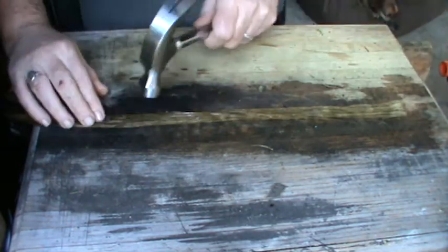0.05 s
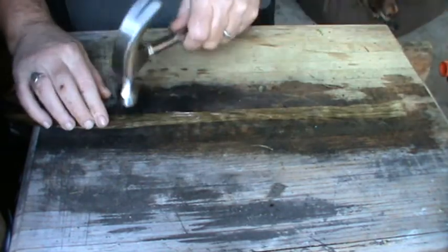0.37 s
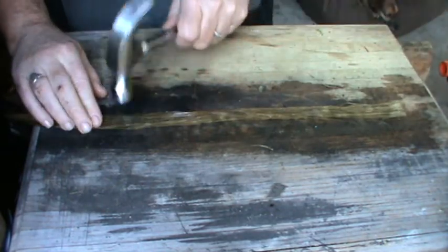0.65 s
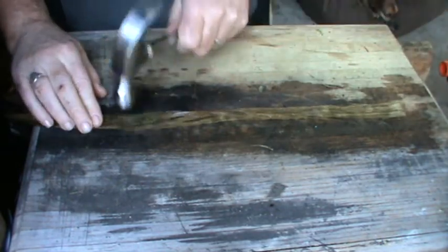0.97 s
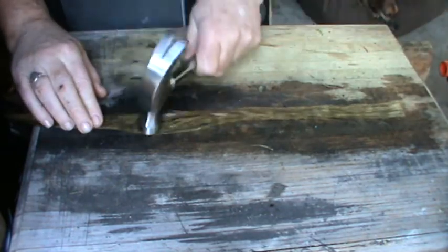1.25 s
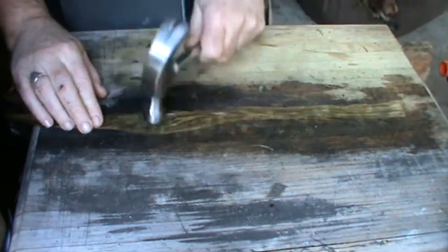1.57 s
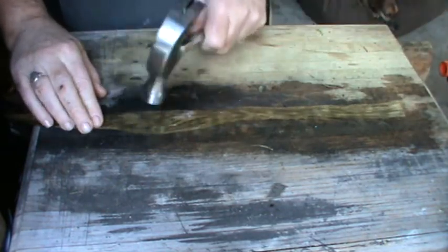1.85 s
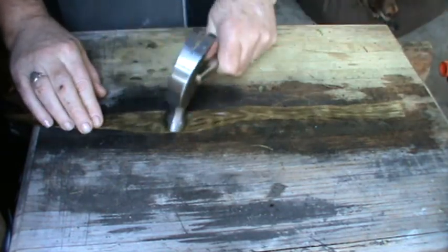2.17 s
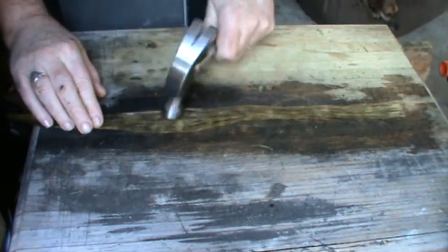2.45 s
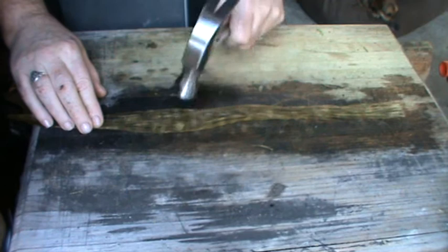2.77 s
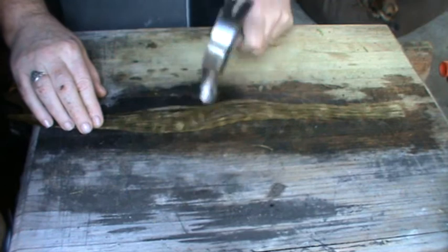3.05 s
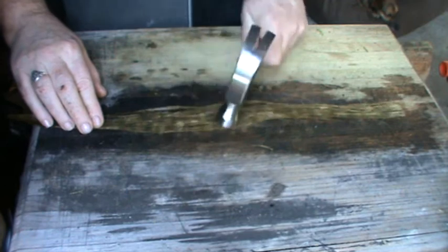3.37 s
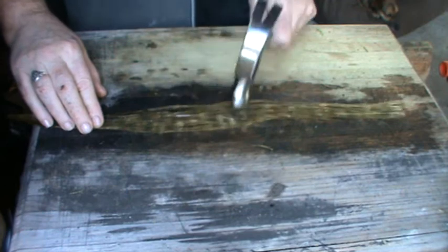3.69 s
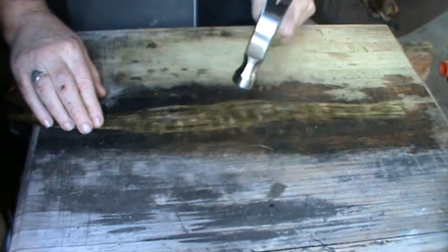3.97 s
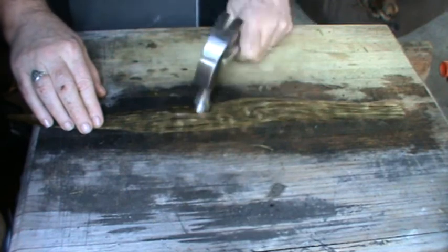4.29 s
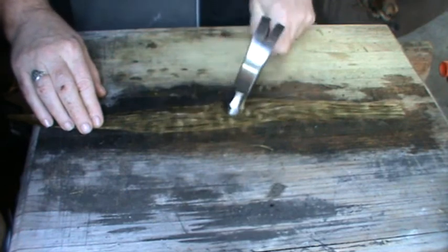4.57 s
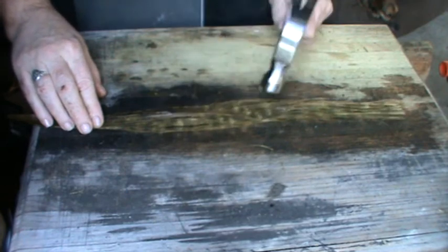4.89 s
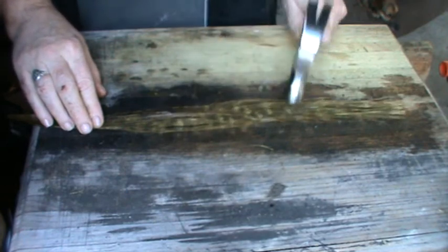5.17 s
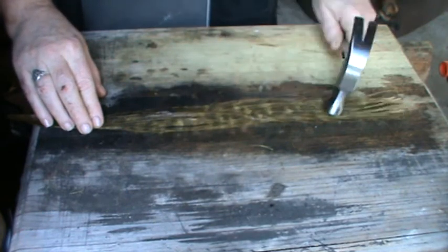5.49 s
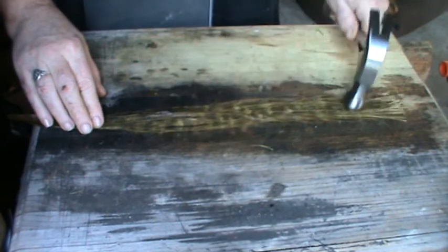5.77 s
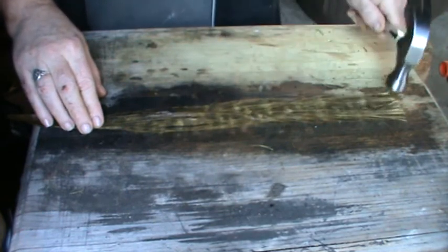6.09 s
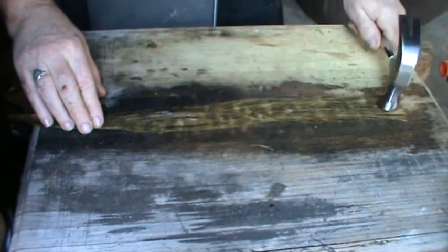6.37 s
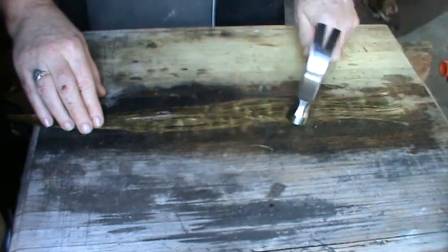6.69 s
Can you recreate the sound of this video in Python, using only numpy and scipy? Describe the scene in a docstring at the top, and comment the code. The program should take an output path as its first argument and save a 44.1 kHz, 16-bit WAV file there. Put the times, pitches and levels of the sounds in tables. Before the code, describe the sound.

A steel hammer taps a leaf on a wooden board steadily, about four sharp, booming knocks a second, in a small room.

```python
"""A steel hammer taps a long leaf flat on a wooden board, about four blows a second, left to right.
Each blow cracks the fibres and knocks the board; bench and small room boom on after it.
A few blows make the steel head ring thinly. Under it lie a few tiny clicks, a faint, high,
intermittent chirping and quiet room noise. Two microphones feed a limiter."""
import sys
import numpy as np
from scipy import signal
from scipy.fft import rfft, irfft, next_fast_len
from scipy.io import wavfile
from scipy.ndimage import uniform_filter1d, minimum_filter1d

SR = 44100
rng = np.random.default_rng(int(sys.argv[2]) if len(sys.argv) > 2 else 0)


def generate_wav(signal):
    """Clip the signal to [-1, 1] and save it as 16-bit WAV at the path in sys.argv[1]."""
    frames = np.transpose(np.atleast_2d(signal))
    scaled = np.clip(frames, -1, 1) * 32767
    pcm = np.round(scaled).astype(np.int16)
    wavfile.write(sys.argv[1], SR, pcm)


N = 301281
AGE_S = np.arange(SR // 2) / SR  # time since an onset
SIDES = np.array([[1], [-1]])  # left, right

# hammer blows: t/s, strength/dB, contact hardness/dB
BLOWS = [(0.5495, -0.2, 1.2), (0.787, 2, 5), (1.0266, .5, .5), (1.253, 0.4, 0.7), (1.4823, -0.3, -0.6),
         (1.7076, -0.2, -1), (1.9356, 0.1, 0.4), (2.1667, 2, 3.5), (2.3984, .5, 2.5), (2.623, -0.4, -0.4),
         (2.866, 0.8, -.5), (3.107, 1, 1.3), (3.3382, 1.5, 1.5), (3.5763, -0.5, 0.5), (3.8085, .2, -.5),
         (4.0471, -.1, 3), (4.2904, 2.5, 3), (4.5123, 0.6, 2), (4.7441, 0, 0), (4.973, -1, -0.5),
         (5.21, -0.5, 2.5), (5.4452, -1.5, 2), (5.6844, -1, 4.5), (5.9204, -1, 2.9), (6.148, 0, 3),
         (6.3749, -0.7, 3), (6.6793, -0.9, 3)]
# hammer path: t/s, place (0 left, 1 middle, 2 right)
HAMMER_PATH = [(.55, 0.031), (2.3, 0.18), (2.62, 0.4), (2.87, 0.73), (3.3, 1), (5.1, 1.06), (5.45, 1.737),
               (6.38, 1.88), (6.68, 1.14)]
# room sound balance: f/Hz, left minus right/dB
ROOM_BALANCE = [(50, 4.5), (130, -2), (280, -2), (550, -4.5), (750, -5), (1200, -2.5), (3000, -2),
                (8000, 0)]
def hammer():
    """Each blow: board knock and contact click, their reflections, then boom and reverberation."""
    out = np.zeros((2, N))
    places = [np.interp(t_s, *np.transpose(HAMMER_PATH)) for t_s, *_ in BLOWS]
    booms = bench_booms(places)
    rooms = np.array([diffuse_field() for _ in range(3)])  # left, middle, right
    balance = amp(SIDES * along(ROOM_BALANCE, freqs(len(AGE_S))) / 2)
    for (t_s, strength_db, hardness_db), place, boom in zip(BLOWS, places, booms):
        force = blow_spectrum(strength_db, hardness_db, place)
        direct = colour(board_knock(place), force) + contact_click(place)
        room = irfft(rfft(boom + reverberation(rooms, place)) * balance, len(AGE_S))
        fibres = fibre_crunch()
        direct = colour(direct, fibres)
        room = colour(colour(room, force), fibres)
        add(out, t_s, direct + room)
        add_reflections(out, t_s, direct)
    return out


def blow_spectrum(strength_db, hardness_db, place):
    """A harder contact is shorter and drives the upper modes more: f/Hz, level/dB."""
    edge = max(place - 1, 0)  # hollow toward the right end
    hollow = [(hz, strength_db + db * edge) for hz, db in [(70, -5.5), (300, -0.5), (520, 3.5)]]
    upper_db = strength_db + hardness_db
    treble_db = -3 + 0.86 * hardness_db + 2.5 * abs(place - 1)
    return hollow + [(1100, upper_db), (2200, upper_db), (4500, treble_db)]


# board modes: f/Hz, t60/s, level/dB struck left, middle, right
BOARD_MODES = [(162.7, 0.057, -2, -5, -6), (291, 0.043, 5.5, 3.5, 3), (373, 0.036, 1, -3.5, -5),
               (479, 0.02, -13, -14.5, -10), (722, 0.037, 1, -18.5, -6), (805, 0.051, -8, -40, 1),
               (1167, 0.066, -11.5, -35.5, -13), (1407, 0.031, -16, -15.5, -37),
               (1803, 0.02, -12.5, -16.5, -22.5), (2710, 0.017, -16.5, -31, -24),
               (3266, 0.025, -23.5, -31, -29), (4580, 0.014, -24.5, -26, -31)]
def board_knock(place, gain_db=-7, cushion_s=0.0013):
    """Quickly damped modes of the wood; the leaf cushions their onset."""
    modes = np.array([-np.sin(2 * np.pi * hz * AGE_S) * fade(t60_s) for hz, t60_s, *_ in BOARD_MODES])
    knock = amp(gain_db) * mode_gains(BOARD_MODES, place) @ modes
    knock *= 1 - np.exp(-(AGE_S / cushion_s) ** 2)
    return colour(knock, [(40, -13.5), (95, -11.5), (145, 0)])  # a small board radiates little bass


# click spectrum: f/Hz, level/dB
CLICK_SPECTRUM = [(600, 8), (1500, 7.5), (3000, 8), (5500, -5.5), (8500, -1), (12000, -6.5), (16000, -19)]
def contact_click(place, gain_db=-26, edge_db=-3.5, scatter_db=1.4):
    """Noise burst at contact with a faint tail, softer toward the right end."""
    click = stereo_noise(len(AGE_S), CLICK_SPECTRUM) * (fade(0.0091) + amp(-18) * fade(0.12))
    level_db = gain_db + edge_db * max(place - 1, 0) + scatter_db * rng.standard_normal()
    return click * amp(level_db + SIDES * 1.1)


def fibre_crunch(bands=14, scatter_db=2.3):
    """Fibres give way differently at each blow, so the treble is uneven: f/Hz, level/dB."""
    uneven_db = scatter_db * rng.standard_normal(bands)
    return [(1800, 0)] + list(zip(np.geomspace(2300, 14000, bands), uneven_db))


# bench and room resonances: f/Hz, level/dB struck left, middle, right
BOOM_MODES = [(59.8,-11,-9,-9), (129,-16,-8,-11), (159.8,-1,-1.5,-2.5), (181.8,-13,-29.5,-22),
              (194.25,3.5,2.5,-2.5), (228.3,-10.5,-14,-4.5), (253.6,-3.5,-17.5,-12), (272.1,1.5,2.5,6),
              (290.2,5.5,6.5,8.5), (310.5,-18,-4.5,-28), (324,-1,-11,-0.5), (351,-12,-2,-0.5),
              (375.2,-6,-10,-8), (409,-9,-7,-22), (472,-7,-3,-4.5), (502.8,3.5,-6,6), (528.4,1.5,-3,-3),
              (557,-2,-6,4), (576.7,3,-21,5), (661,-16,-23,-4), (718.4,-8,-15,-7.5), (740,-26,-22,-1),
              (799.7,-10,-19,-2.5), (820,-20,-15,-5), (851,-27,-13,1.5), (922,-9,-10,-4),
              (1021,-25,-26,3.5), (1146,-10,-14.5,-41), (1190,-13.5,-9.5,-40), (1454,-46,-13,-43)]
def bench_booms(places, gain_db=-25, in_step_s=0.039):
    """One boom per place: low modes swell in step, high ones die sooner and scatter in phase."""
    modes = []
    for hz, *_ in BOOM_MODES:
        common, side = rng.standard_normal(2)
        phase = common * (hz / 390) ** 3 + SIDES * side * min(hz / 550, 1) / 2
        envelope = swell(t60_s=0.27 * (300 / hz) ** 0.11, rise_s=0.015, hold_s=0.064)
        modes.append(envelope * np.cos(2 * np.pi * hz * (AGE_S - in_step_s) + phase))
    return [amp(gain_db) * np.tensordot(mode_gains(BOOM_MODES, place), modes, 1) for place in places]


# first reflections: delay/s, level/dB, left minus right/dB
REFLECTIONS = [(0.0137, -19.5, 4), (0.0231, -11, -3), (0.0286, -11.5, 2.5), (0.0371, -14, 3),
               (.052, -12.5, -7.5), (.069, -11, -1)]
# wall and bench response: f/Hz, level/dB
WALL_RESPONSE = [(60, -7.5), (200, -1.5), (1500, -2), (4000, -2.5), (8000, -4), (11000, -6), (15000, -19)]
def add_reflections(out, t_s, direct):
    """Walls and bench return delayed copies and swallow their treble."""
    reflected = colour(direct, WALL_RESPONSE)
    for delay_s, level_db, pan_db in REFLECTIONS:
        add(out, t_s + delay_s, reflected * amp(level_db + SIDES * pan_db / 2))


def reverberation(rooms, place, gain_db=-22, fresh_gain=0.39):
    """Paths through the room change as the hammer travels, and a little from blow to blow."""
    weights = np.sqrt(np.clip(1 - abs(place - np.arange(3)), 0, 1))
    return amp(gain_db) * (np.tensordot(weights, rooms, 1) + fresh_gain * diffuse_field())


# reverberation spectrum: f/Hz, level/dB
DIFFUSE_SPECTRUM = [(30, -6.5), (60, -6.5), (92, -7), (140, 3), (300, -0.5), (550, 3), (850, -2.5),
                    (1200, -5), (1500, -14), (2200, -20.5), (3000, -27), (4400, -29.5), (5500, -33.5),
                    (9500, -39), (12500, -45.5), (16000, -59)]
# reverberation time: f/Hz, t60/s
ROOM_DECAY = [(50, 0.2), (150, 0.4), (500, 0.4), (1100, 0.33), (2500, 0.32), (5000, 0.35), (12000, 0.16)]
def diffuse_field():
    """Diffuse room sound, each band with its own decay."""
    n = len(AGE_S)
    spectrum = rfft(stereo_noise(n, DIFFUSE_SPECTRUM))
    centres_hz, decays_s = np.transpose(ROOM_DECAY)
    out = 0
    for share, t60_s in zip(np.eye(len(centres_hz)), decays_s):
        band_gain = along(np.column_stack([centres_hz, share]), freqs(n))
        out += irfft(spectrum * band_gain, n) * swell(t60_s, rise_s=0.0011, hold_s=0.063)
    return out


# blows that ring the head: t/s, level/dB
HEAD_RINGS = [(.787, -68), (1.253, -67), (1.482, -71), (1.707, -53)]
def steel_ring(hz=7890, t60_s=0.42):
    """One thin mode of the hammer head."""
    out = np.zeros((2, N))
    for t_s, level_db in HEAD_RINGS:
        add(out, t_s, amp(level_db) * np.sin(2 * np.pi * hz * AGE_S) * fade(t60_s))
    return out


# one click as the chirping starts, then tiny snaps after blows: t/s, level/dB
SMALL_CLICKS = [(0.357, -43), (.856, -33), (1.095, -40), (3.285, -44), (4.565, -34), (6.723, -32.5)]
def small_clicks(gain_db=-3):
    """Small clicks and lift ticks: tiny noise bursts with a trace of room."""
    out = np.zeros((2, N))
    envelope = fade(0.018) + amp(-18) * fade(0.16)
    for t_s, level_db in list(SMALL_CLICKS) + lift_ticks():
        noise = stereo_noise(len(AGE_S), [(500, 0), (2500, 3), (8000, -2.5), (13000, -10)])
        add(out, t_s, noise * amp(level_db + gain_db) * envelope)
    return out


def lift_ticks(from_s=2.6, lag_s=0.15, jitter_s=0.012, level_db=-45, scatter_db=1.5):
    """A faint tick as the hammer rises after each later blow: t/s, level/dB."""
    draws = rng.standard_normal((len(BLOWS), 2))
    ticks = [(t_s + lag_s + jitter_s * late, level_db - scatter_db * softer)
             for (t_s, *_), (late, softer) in zip(BLOWS, draws) if t_s > from_s]
    return [(t_s, db) for t_s, db in ticks if t_s < N / SR]


# chirping spells: start/s, end/s, period/s
CHIRP_SPELLS = [(.38, 2.5, 0.075), (2.5, 3.7, .041), (5.591, 6.67, .06)]
# pips of one chirp: f/Hz, level/dB, centre/s, half width/s
CHIRP_PIPS = [(4700, -58.5, 0.0456, 0.0046), (2416, -55.5, 0.072, 0.0095), (3600, -69, 0.091, 0.017),
              (6400, -70, 0.06, .025)]
def chirping(rough_rad=0.61, detune=0.0085, jitter_s=0.0027):
    """Faint, slightly rough tone pips, four to a chirp."""
    out = np.zeros((2, N))
    for start_s, end_s, period_s in CHIRP_SPELLS:
        for t_s in np.arange(start_s, end_s, period_s):
            sharp, louder, late = rng.standard_normal(3)
            waver = rough_rad * unit_rms(uniform_filter1d(rng.standard_normal(len(AGE_S)), size=60))
            for hz, level_db, centre_s, half_width_s in CHIRP_PIPS:
                tone = np.sin(2 * np.pi * hz * (1 + detune * sharp) * AGE_S + waver)
                envelope = np.exp(-((AGE_S - centre_s) / half_width_s) ** 2)
                add(out, t_s + jitter_s * late, tone * envelope * amp(level_db + 2 * louder))
    return out


# room noise spectrum: f/Hz, level/dB
NOISE_SPECTRUM = [(12, -28), (20, 4), (35, 1.5), (47, -15), (76, -3), (191, -9.5), (565, -10), (631, -12),
                  (906, -12.5), (2540, -27), (5230, -34), (10200, -34.5), (15500, -39)]
def room_noise(gain_db=-48.5):
    """Steady, quiet noise, mostly bass."""
    return amp(gain_db) * stereo_noise(N, NOISE_SPECTRUM)


# how alike the noise is left and right, nearly mono in the bass and at the top: f/Hz, correlation
NOISE_LIKENESS = [(30, 0.79), (70, 1), (150, 1), (300, 1), (600, 0.86), (1200, 0.28), (2200, 0.5),
                  (5000, 0.36), (9000, 0.52), (13000, 0.96)]
def stereo_noise(n, spectrum):
    """Unit-rms noise of a given spectrum, partly alike in both channels."""
    hz = freqs(n)
    alike = np.clip(along(NOISE_LIKENESS, hz), 0, 1)
    mid, side = np.exp(2j * np.pi * rng.random((2, len(hz))))
    pair = mid * np.sqrt(1 + alike) + SIDES * side * np.sqrt(1 - alike)
    return unit_rms(irfft(pair * amp(along(spectrum, hz)), n))


def mode_gains(modes, place):
    """Gains interpolated between the left, middle and right level columns."""
    return amp([np.interp(place, np.arange(3), row[-3:]) for row in modes])


def swell(t60_s, rise_s, hold_s):
    """Room sound builds up, holds while the first reflections arrive, then dies away."""
    decay_time_s = np.hypot(AGE_S, hold_s) - hold_s
    return (1 - np.exp(-AGE_S / rise_s)) * np.exp(-np.log(1000) * decay_time_s / t60_s)


def fade(t60_s):
    """Exponential decay."""
    return np.exp(-np.log(1000) * AGE_S / t60_s)


def colour(x, spectrum):
    """Minimum-phase filter from points of f/Hz, level/dB."""
    n = x.shape[-1]
    size = next_fast_len(n + len(AGE_S) // 2) * 2
    cepstrum = irfft(np.log(amp(along(spectrum, freqs(size)))))
    cepstrum[1:size // 2] *= 2
    cepstrum[size // 2 + 1:] = 0
    return irfft(rfft(x, size) * np.exp(rfft(cepstrum)))[..., :n]


def along(points, hz):
    """Interpolate points of f/Hz, value over log frequency."""
    points_hz, values = np.transpose(points)
    return np.interp(np.log(np.maximum(hz, 1)), np.log(points_hz), values)


def freqs(n):
    """Bin frequencies for n samples."""
    return np.arange(n // 2 + 1) * SR / n


def amp(db):
    """Decibels to gain."""
    return 10 ** (np.asarray(db) / 20)


def unit_rms(x):
    """Scale to rms 1."""
    return x / np.sqrt(np.mean(x ** 2))


def add(out, t_s, x):
    """Mix x into out from t_s."""
    i = max(int(t_s * SR), 0)
    out[:, i:i + x.shape[-1]] += x[..., :out.shape[1] - i]


def limiter(x, ceiling_db=-3, release_s=0.013, window_samples=64):
    """Both channels dip just ahead of each peak over the ceiling, then recover."""
    release = np.arange(N) / SR / release_s
    overshoot = np.log(np.maximum(abs(x).max(axis=0) / amp(ceiling_db), 1))
    gain = np.exp(release - np.maximum.accumulate(overshoot + release))
    return x * uniform_filter1d(minimum_filter1d(gain, window_samples), window_samples)


def scene():
    """The hammering over the quiet room."""
    background = room_noise()
    return hammer() + steel_ring() + small_clicks() + chirping() + background


# left microphone's phase lead: f/Hz, phase/rad
MIC_PHASE = [(10, 0), (35, -0.47), (60, -0.26), (170, -0.67), (300, -0.59), (520, -1.24), (900, -0.59),
             (2500, 0.27)]
def record(dry, drive_db=1.23, cutoff_hz=16000):
    """The two microphones differ in phase; a limiter evens out the blows; the top is cut."""
    heard = irfft(rfft(dry) * np.exp(0.5j * SIDES * along(MIC_PHASE, freqs(N))), N)
    lowpass = signal.ellip(8, 0.2, 70, cutoff_hz, fs=SR, output="sos")
    return signal.sosfilt(lowpass, limiter(amp(drive_db) * heard))


dry = scene()
out = record(dry)
generate_wav(out)
```